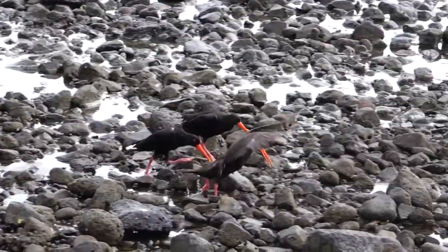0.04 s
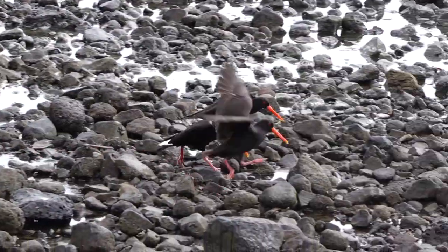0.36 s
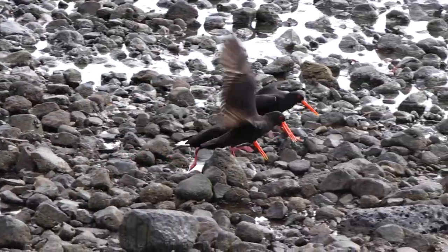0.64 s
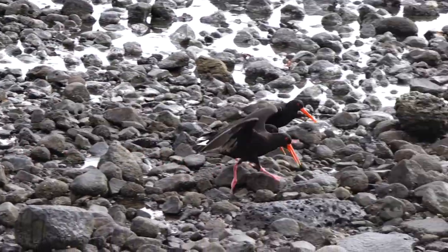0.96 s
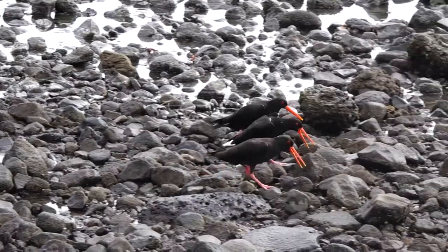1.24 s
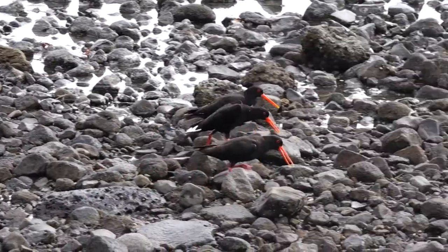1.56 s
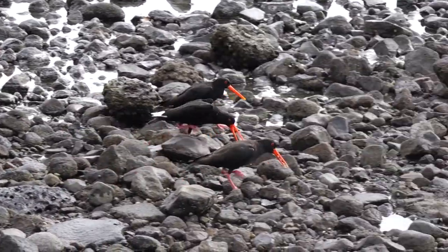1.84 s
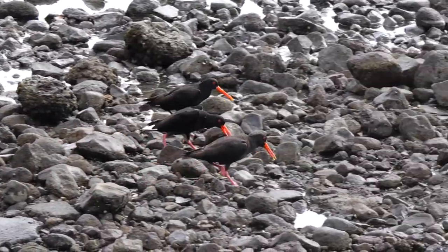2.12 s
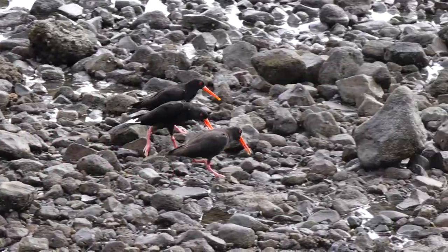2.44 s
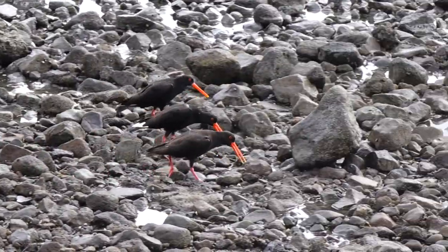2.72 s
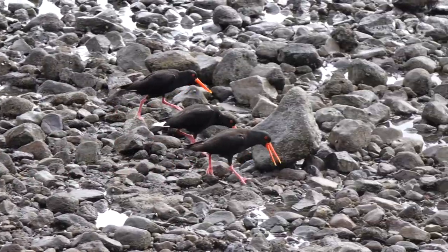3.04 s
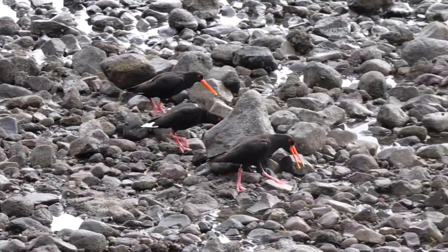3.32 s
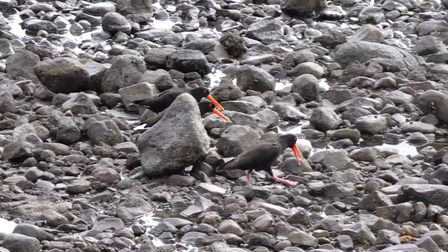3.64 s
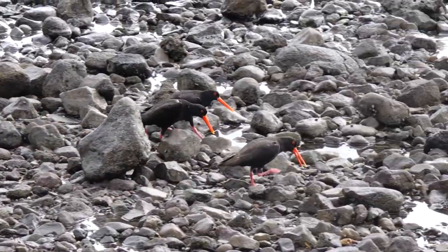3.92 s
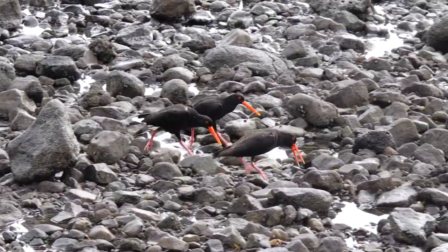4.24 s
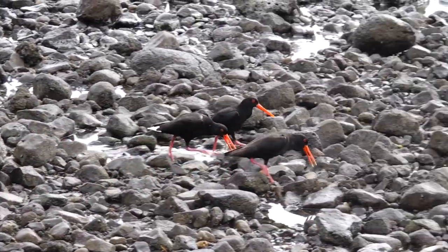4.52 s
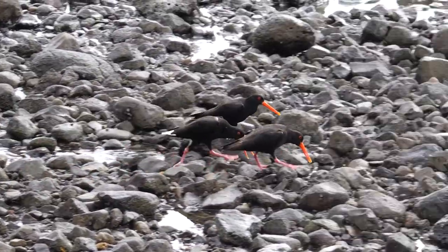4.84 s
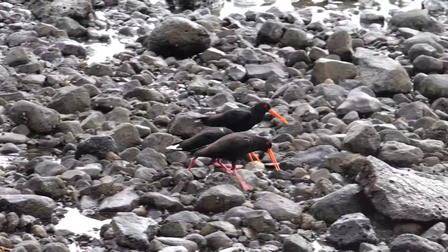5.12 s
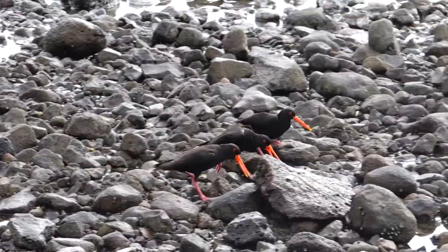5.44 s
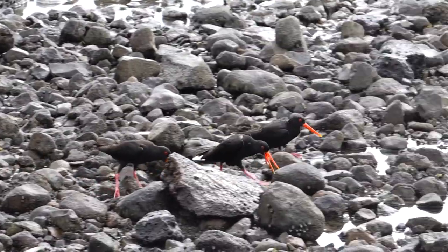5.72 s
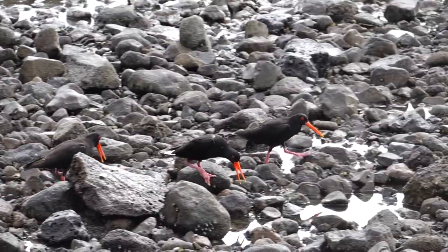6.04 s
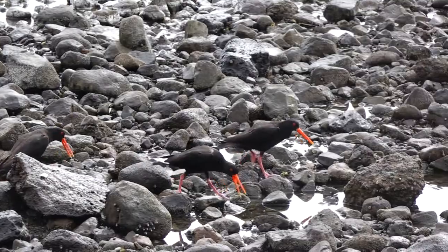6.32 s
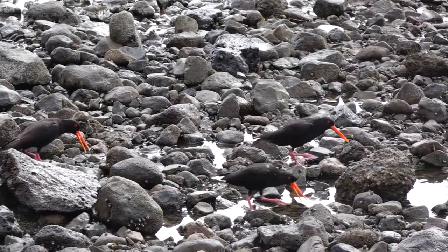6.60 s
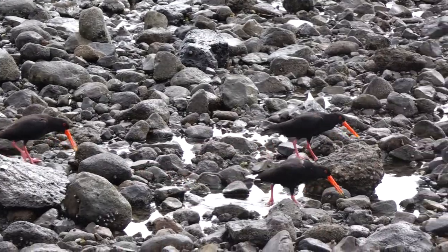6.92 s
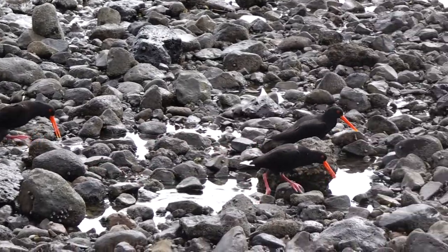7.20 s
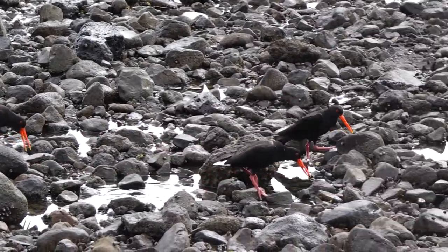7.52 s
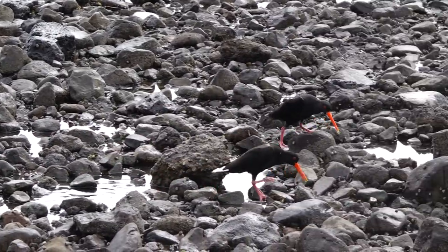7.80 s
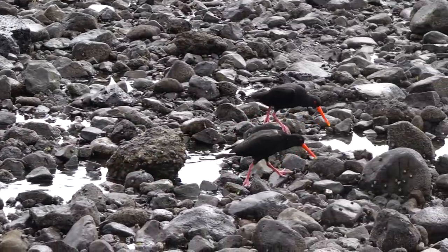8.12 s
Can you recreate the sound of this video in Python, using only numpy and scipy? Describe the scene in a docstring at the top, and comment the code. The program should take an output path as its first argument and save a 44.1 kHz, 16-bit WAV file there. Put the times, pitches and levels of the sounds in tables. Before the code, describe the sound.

Oystercatchers call on a boulder shore for about eight seconds. From the start they pipe very short, sharp, high notes, roughly eight to ten a second at uneven intervals, varying in pitch and strength, some clear whistles and some a little raspy. A shriller, slightly longer call cuts in at about 1.2 seconds, the loudest one at 2.6, and another at 3. From about 4.7 seconds one bird repeats a soft, lower note three or four times a second, quickening slightly, while the sharp piping goes on, with strong notes around 5.4 to 6 seconds. The calls are somewhat softer near the end. The stones give each note a brief, light echo. Underneath, distant surf makes a low, steady wash, with a faint fizz of draining water and a thin hiss that swells slightly in the second half.

```python
"""Oystercatchers pipe short, sharp notes on a boulder shore, with low surf behind them.
Each note is one arch of pitch: its harmonics sweep through the fixed resonances of the windpipe,
so soft notes sound on their second harmonic and full ones on their first. Three shrill calls cut in,
and later one bird repeats a soft note. The stones scatter the calls, while countless far bubbles
make the wash of the surf and the fizz and hiss of the water."""
import sys
import numpy as np
from scipy import signal
from scipy.fft import rfft, irfft, next_fast_len
from scipy.io import wavfile
from scipy.ndimage import uniform_filter1d

SR = 44100
rng = np.random.default_rng(int(sys.argv[2]) if len(sys.argv) > 2 else 0)


def inscribe(sig):
    """Save sig as 16-bit PCM at rate SR to the path in sys.argv[1].

    A 1-D sig is mono; a 2-D sig holds one channel per row.
    Samples are clipped to [-1, 1] before scaling.
    """
    pcm = np.round(np.clip(np.atleast_2d(sig).T, -1, 1) * 32767)
    wavfile.write(sys.argv[1], SR, pcm.astype(np.int16))


N = 359856

# Levels are relative. Gape is how much the open bill lifts the overtones; balance is left minus right.
# piping notes; rasp is the level change before and after the clear whistle:
# (start [s], length [s], top pitch [Hz], level [dB], gape [dB], rasp [dB])
PIPING_NOTES = [(0.038, 0.011, 2110, -26.5, 2, -5), (0.113, 0.018, 1060, -34, -11, -3),
                (0.19, 0.018, 2000, -24.5, -2, -16), (0.431, 0.025, 1834, -26, -12, -13),
                (0.522, 0.011, 1780, -17.5, -18, -5), (0.531, 0.014, 1132, -29, -7, -3),
                (0.623, 0.022, 1970, -29, -4, -6), (0.714, 0.011, 1215, -22.0, -24, -3),
                (0.803, 0.016, 1450, -24.5, -6, -4), (0.814, 0.017, 2144, -24.5, -5, -8),
                (0.902, 0.022, 1470, -31.0, 0, -1), (0.926, 0.02, 1805, -24.5, -20, -15),
                (1.007, 0.028, 1965, -23.5, -3, -7), (1.107, 0.025, 1450, -33, -5, 6),
                (1.12, 0.022, 1950, -29, -13, -4), (1.338, 0.019, 1200, -32, -4, -3),
                (1.395, 0.074, 2181, -26.5, 10.5, 0.5), (1.514, 0.035, 2185, -17.5, -7, -9),
                (1.603, 0.083, 1995, -27.5, 2.5, -2), (1.705, 0.025, 2128, -21.5, -2, -1.5),
                (1.81, 0.064, 2174, -25.5, 7, 2), (1.932, 0.025, 1982, -24.5, -1, -8),
                (2.05, 0.035, 2160, -23, 3, 0.5), (2.103, 0.013, 1970, -29.0, 0, 1),
                (2.282, 0.045, 2130, -26.0, 6, -8), (2.45, 0.022, 1454, -27.5, -10.5, -5),
                (2.619, 0.041, 2216, -26.5, 3, -1), (2.781, 0.015, 2060, -26.5, 4, -4),
                (2.914, 0.031, 2253, -20.5, 1.5, -5), (3.076, 0.01, 2070, -27.5, 8, 0),
                (3.188, 0.019, 1520, -33, 3, -3), (3.213, 0.023, 2190, -27, 6.5, -1),
                (3.315, 0.016, 2250, -26, 3, 2), (3.369, 0.019, 1453, -27, -6, -2.5),
                (3.52, 0.018, 2118, -22, -4.5, -9), (3.59, 0.029, 2090, -28.5, -5, -13),
                (3.665, 0.024, 1530, -33.5, 4, -8), (3.801, 0.035, 2108, -25.5, 0, -3),
                (3.962, 0.021, 1515, -28.5, -5, -2), (4.102, 0.031, 2115, -29.5, 7, -1),
                (4.26, 0.025, 2254, -28.5, -10, -1), (4.37, 0.016, 1503, -34.5, 3, 6),
                (4.404, 0.032, 2264, -22, 1.5, -2.5), (4.461, 0.016, 1370, -33.5, 3, -6),
                (4.534, 0.021, 1530, -30, 7.5, 0), (4.578, 0.036, 2142, -29, 11.5, 7),
                (4.621, 0.027, 2160, -28.5, 1, -3), (4.735, 0.022, 1430, -30.0, -3, -8),
                (4.861, 0.047, 2238, -32.0, 13, 7), (4.966, 0.028, 1775, -24, -11, -16),
                (5.036, 0.013, 1800, -23, -11, -17), (5.098, 0.015, 1860, -25, -5, -15),
                (5.158, 0.016, 2076, -26, -1, 6.5), (5.22, 0.015, 1155, -36, -2, -3),
                (5.36, 0.017, 1166, -35, -6, -2), (5.441, 0.028, 1926, -17.5, -8.5, -3),
                (5.51, 0.022, 1157, -33, -6, -3), (5.588, 0.018, 2220, -26, -12, -14),
                (5.655, 0.022, 1192, -31, -4, -2.5), (5.729, 0.028, 2123, -18.5, 1, 3.5),
                (6.016, 0.045, 2180, -22.5, 11.5, 1.5), (6.293, 0.022, 2098, -26.5, 9, 5.5),
                (6.502, 0.013, 1254, -37, 2, -3), (6.56, 0.023, 2100, -21.5, 4.5, 0.5),
                (6.627, 0.014, 1925, -29.5, -5, -13), (6.749, 0.01, 1100, -31, -8, -3),
                (6.864, 0.015, 1400, -29.5, -4, -1), (7.099, 0.023, 1725, -23.0, -27, -7),
                (7.125, 0.018, 1430, -33, -1, -3), (7.207, 0.019, 2066, -23, -6, -13),
                (7.323, 0.025, 1926, -27.5, -1, -17), (7.391, 0.017, 1474, -30.5, -3, 4),
                (7.449, 0.013, 1190, -33, -5, -2), (7.576, 0.022, 1255, -33, -6, -3),
                (7.668, 0.034, 1142, -33, -1, -3), (7.805, 0.024, 1503, -34, 4, 0),
                (7.827, 0.011, 2010, -29.5, 9, 0), (7.963, 0.016, 1394, -26.5, -2, -5),
                (8.063, 0.029, 1437, -30.5, 3.5, -13)]
# three shrill calls, a list of points each: (time [s], pitch [Hz], level [dB], gape [dB])
SHRILL_CALLS = [
    [(1.145, 2140, -22, -2), (1.16, 2390, -20, 10), (1.166, 2660, -19.5, 12), (1.178, 2584, -17.5, -6),
     (1.202, 2545, -17.5, 10), (1.208, 2367, -17.5, 13), (1.235, 2315, -21.5, 5.5), (1.285, 2040, -26.5, 8),
     (1.302, 1680, -23.5, -5)],
    [(2.615, 1890, -22.5, -2), (2.629, 2180, -22, 9.5), (2.633, 2550, -15, 3), (2.641, 2657, -13, 2.5),
     (2.657, 2490, -14, -7), (2.662, 2175, -21, 1), (2.67, 2000, -18.5, -8), (2.678, 1900, -31, -2)],
    [(2.957, 1930, -40, 0), (2.964, 2090, -33, 18), (2.972, 2310, -30, 14), (2.974, 2600, -22, 8),
     (2.982, 2680, -19.5, 11), (2.998, 2530, -24, 4), (3.002, 2180, -26, 10.5), (3.017, 1790, -32, 2)],
]
# how hard the trilling bird calls: (time [s], level [dB], top pitch [Hz])
TRILL_EFFORT = [(4.7, -39, 1140), (5.28, -34.5, 1200), (5.57, -28, 1172), (5.85, -30.5, 1160),
                (6.13, -31.5, 1190), (6.41, -34, 1170), (6.7, -33.5, 1124), (6.96, -36, 1092),
                (7.23, -39, 1080), (7.5, -30, 1140), (7.77, -30, 1135)]
# resonances, where the windpipe rings: (frequency [Hz], width [Hz], level [dB])
WINDPIPE_RESONANCES = [(2150, 990, 2), (4460, 420, -8), (6520, 710, -12.5), (8950, 460, -27),
                       (10200, 3000, -26.5), (13300, 1700, -31), (15300, 900, -38)]
# what passes between the resonances: (frequency [Hz], level [dB])
WINDPIPE_FLOOR = [(1000, -57), (7000, -18.5), (9000, -33.5), (16000, -48)]
# which side the calls lean to: (frequency [Hz], balance [dB])
BIRD_BALANCE = [(2500, -1), (4400, 8), (6500, -5.5), (9000, 1)]
# how long the shore echoes: (frequency [Hz], time to fade by 60 dB [s])
SHORE_DECAY = [(500, 0.22), (2300, 0.58), (4500, 0.23), (9000, 0.21), (15000, 0.16)]
# tone of the surf: (frequency [Hz], level [dB])
SURF_SPECTRUM = [(15, -72), (25, -42), (49, -66), (109, -16.5), (196, -15.5), (297, -5), (423, -1.5),
                 (628, -6), (806, -4), (1100, -1), (1300, -4), (1530, -1.5), (2100, -3.5), (2430, -9),
                 (3600, -18), (4680, -32), (7920, -120)]
# humps and dips in that tone: (frequency [Hz], width [Hz], level [dB])
SURF_HUMPS = [(410, 190, 0.5), (600, 180, 0.5), (812, 95, 3.5), (1090, 190, 2.5), (1485, 170, -4.5),
              (2170, 300, -2)]
# loudness of the surf: (time [s], level [dB])
SURF_LEVEL = [(0.0, -32.5), (1.07, -34.5), (4.79, -33.5), (8.14, -35), (8.16, -36)]
# tone of water fizzing as it drains among the stones: (frequency [Hz], level [dB])
FIZZ_SPECTRUM = [(1760, -20.5), (3000, -3.5), (3210, -14.5), (3870, -6.5), (4350, 0), (4790, -0.5),
                 (5700, -3.5), (6490, 0), (7610, -2.5), (8620, -8), (13800, -13.5), (15600, -19.5)]
# loudness of the fizz: (time [s], level [dB])
FIZZ_LEVEL = [(0.0, -43.5), (1.66, -42.5), (2.18, -44), (3.02, -42), (6.57, -43), (6.77, -44), (8.16, -44)]
# tone of a thin hiss of water: (frequency [Hz], level [dB])
HISS_SPECTRUM = [(2500, -40), (5400, -22), (6300, -1), (7000, 0), (7700, -7), (8800, -25), (15000, -45)]
# the hiss swells unevenly: (time [s], level [dB])
HISS_LEVEL = [(0, -58), (1.5, -53), (2.6, -60), (4.5, -57), (5.7, -48), (7.2, -53), (8.16, -49)]
# how alike the water sounds left and right: (frequency [Hz], likeness [0-1])
WATER_LIKENESS = [(30, .8), (100, 0.98), (400, 0.98), (1000, 0.93), (2200, 0.67), (4000, 0.62), (8000, .35),
                  (15000, .35)]
# which side the water leans to: (frequency [Hz], balance [dB])
WATER_BALANCE = [(40, -3), (150, -0.7), (700, -3), (1500, -0.4), (4000, -1.5), (12000, -1)]
# how far the wave at the left microphone is ahead: (frequency [Hz], phase lead [rad])
MIC_PHASE = [(100, 0.18), (700, -0.19), (1400, -0.33), (2300, -0.59), (4300, -2.03), (6500, -1.59),
             (15000, -1.63)]

REST_HZ, TOP_HZ = 857.6, 15800  # foot of each arch of pitch; upper limit of the whole sound


def piping_note(start_s, length_s, top_hz, level_db, gape_db, rasp_db,
                rise_share=.297, lead_s=.008, tail_s=.021):
    """Air pressure arches up and down, carrying the pitch: a rasp, a clear whistle, a falling tail."""
    rise_s = rise_share * length_s
    fall_s = length_s - rise_s
    t = np.arange(-rise_s - 4 * lead_s, fall_s + 3 * tail_s, 1 / SR)  # zero at the top of the arch
    half_s = np.where(t < 0, rise_s, fall_s)
    linger_s = np.where(t < 0, lead_s, tail_s)
    arch = .47 / (1 + abs(t / half_s) ** 4.45)
    low_register = .53 * np.exp(-np.maximum(abs(t) - half_s, 0) / linger_s)
    pressure = arch + low_register
    pitch = REST_HZ + (top_hz - REST_HZ) * pressure
    whistle_pressure = np.where(t < 0, .918, .73)  # the whistle catches late and lets go late
    slack = 1 / (1 + np.exp((pressure - whistle_pressure) / .024))  # 0 = whistle, 1 = rasp
    falter_db = -5.5 * np.sin(np.pi * slack) * (t > 0)  # a dip as the whistle lets go
    loud_db = level_db + 1.01 * 20 * np.log10(pressure) + rasp_db * slack + falter_db
    closing_db = -4 * (1 - pressure)  # the bill is wide open only at the top
    second_db = gape_db + .74 + closing_db
    treble_db = .76 * gape_db + closing_db
    note = voice_box(pitch, loud_db, second_db, treble_db, slack) * signal.windows.tukey(len(t), .15)
    return start_s + rise_s + t[0], sides(-.3)[:, None] * note


def shrill_call(points):
    """A longer note whose pitch jumps up to a higher register and drops back."""
    times, *curves = np.transpose(points)
    t = np.arange(times[0] - .002, times[-1] + .002, 1 / SR)
    fade = np.clip(np.minimum(t - t[0], t[-1] - t) / .003, 0, 1)
    pitch, level_db, gape_db = (np.interp(t, times, curve) for curve in curves)
    call = voice_box(pitch, level_db, gape_db + 2.5, gape_db - 1, jitter=.003, shimmer_db=.8)
    return t[0], sides(-.5)[:, None] * fade * call


def trill(count=12, first_s=4.706, gap_s=.293, quicken_s=.0028, length_s=.037, gape_db=-3, rasp_db=-.5):
    """One soft note repeats and slowly quickens, its level and pitch following the bird's effort."""
    starts = first_s + np.cumsum([0] + [gap_s - quicken_s * k for k in range(count - 1)])
    times, level_db, pitch = np.transpose(TRILL_EFFORT)
    return [(s, length_s, np.interp(s, times, pitch), np.interp(s, times, level_db), gape_db, rasp_db)
            for s in starts]


def chatter(count=8, from_s=.05, to_s=4.6, level_db=-35, gape_db=-4, rasp_db=-2.5):
    """Faint low notes at loose intervals, before the trill gets going."""
    notes = []
    for k in range(count):
        start_s = from_s + (to_s - from_s) * (k + rng.random()) / count
        length_s, top_hz = rng.uniform(.018, .035), rng.uniform(1100, 1450)
        notes.append((start_s, length_s, top_hz, level_db, gape_db, rasp_db))
    return notes


def voice_box(pitch, level_db, second_db, treble_db, slack=0., jitter=.0048, shimmer_db=1.4):
    """Vibrating membranes make harmonics (multiples of the pitch); when slack, they buzz roughly."""
    size = len(pitch)
    pitch = pitch * (1 + jitter * wander(size, 254) + .028 * slack * wander(size, 406))
    phase = 2 * np.pi * (np.cumsum(pitch) / SR + rng.random())
    harmonic = np.arange(1, 10)[:, None]
    hz = harmonic * pitch
    # slackness weakens the first harmonic and the high ones, leaving a buzz near 2-3 kHz
    slack_db = -6 * slack * np.where(harmonic == 1, 1, np.interp(hz, [3000, 3800], [0, 1]))
    flicker_db = (1.94 + 2.5 * slack) * np.array([wander(size, 160.8) for _ in harmonic])
    gain = windpipe(hz, second_db, treble_db) * amp(slack_db + flicker_db) * (hz < TOP_HZ)
    loudness = np.sqrt(2) * amp(level_db + shimmer_db * wander(size, 163.6))
    return loudness * (gain * np.sin(harmonic * phase)).sum(0)


def windpipe(hz, second_db, treble_db):
    """The air column rings at fixed frequencies; the bill lifts or dims its second one and the treble."""
    power = sum(amp(db) ** 2 / (1 + (2 * (hz - centre) / width) ** 2) ** 2
                for centre, width, db in WINDPIPE_RESONANCES)
    power += amp(curve_at(WINDPIPE_FLOOR, hz)) ** 2
    second_band = np.interp(hz, [2700, 4000, 5000, 6000], [0, 1, 1, 0])
    treble_band = np.interp(hz, [5000, 6000], [0, 1])
    return np.sqrt(power) * amp(second_band * second_db + treble_band * treble_db)


def birds():
    """All the calls together, with some overtones leaning left and others right."""
    calls = np.zeros((2, N))
    for note in list(PIPING_NOTES) + chatter():
        add(calls, *piping_note(*note))
    for note in trill():  # these slide up slowly and end quickly
        add(calls, *piping_note(*note, rise_share=.6, lead_s=.028, tail_s=.008))
    for points in SHRILL_CALLS:
        add(calls, *shrill_call(points))
    size = next_fast_len(N)
    lean = sides(curve_at(BIRD_BALANCE, np.fft.rfftfreq(size, 1 / SR)))
    return irfft(rfft(calls, size) * lean, size)[:, :N]


def boulder_echoes(calls, near_db=-12, near_s=.008, near_count=14, far_db=-18, far_per_s=2000):
    """Stones near the birds throw back a few quick echoes; the wider shore adds a thin tail."""
    near = np.zeros((2, SR))
    delays = ((.001066 + near_s * rng.exponential(1, near_count).clip(0, 4)) * SR).astype(int)
    near[:, delays] = rng.standard_normal((2, near_count)) * np.exp(-delays / SR / near_s / 2)
    bounces = rng.choice([-1., 1.], (2, SR)) * (rng.random((2, SR)) < far_per_s / SR)
    hz, t, bands = signal.stft(bounces, SR, nperseg=256)
    decay = amp(-60 * t / curve_at(SHORE_DECAY, hz)[:, None])
    build_up = 1 - np.exp(-t / .0081)
    far = signal.istft(bands * decay * build_up, SR, nperseg=256)[1][:, :SR]
    echoes = amp(near_db) * near / np.linalg.norm(near[0]) + amp(far_db) * far / np.linalg.norm(far[0])
    return signal.fftconvolve(calls, echoes, axes=1)[:, :N]


def water(spectrum, levels, humps=(), patchy_db=1.5):
    """Countless far bubbles merge into noise with drifting louder patches, a little to the right."""
    frames, hz = N // 512 + 5, np.fft.rfftfreq(2048, 1 / SR)
    draws = rng.standard_normal((5, frames, len(hz)))
    left, unrelated = draws[0] + 1j * draws[1], draws[2] + 1j * draws[3]
    likeness = curve_at(WATER_LIKENESS, hz)
    right = likeness * left + np.sqrt(1 - likeness ** 2) * unrelated
    patches = uniform_filter1d(draws[4], size=8, axis=0)  # smooth over time
    patches = unit(uniform_filter1d(patches, size=16, axis=1))  # then over frequency
    humps_db = sum(db / (1 + (2 * (hz - centre) / width) ** 2) for centre, width, db in humps)
    tone = amp(curve_at(spectrum, hz) + humps_db + patchy_db * patches)
    bands = np.array([left, right]) * tone * sides(curve_at(WATER_BALANCE, hz))[:, None]
    noise = signal.istft(bands.transpose(0, 2, 1), nperseg=2048, noverlap=1536)[1][:, :N]
    return unit(noise) * amp(np.interp(np.arange(N) / SR, *np.transpose(levels)))


def amp(db):
    """Turns decibels into a number to multiply by."""
    return 10 ** (np.asarray(db) / 20)


def unit(x):
    """Scales a signal to an average power of 1."""
    return x / np.sqrt(np.mean(x ** 2) + 1e-20)


def curve_at(points, hz):
    """Joins (frequency, value) points with lines, giving each octave equal room."""
    frequencies, values = np.transpose(points)
    return np.interp(np.log(hz + 1), np.log(frequencies + 1), values)


def add(mix, start_s, sound):
    """Mixes in a stereo sound, cutting off whatever falls outside the mix."""
    start = round(start_s * SR)
    sound = sound[:, max(-start, 0):]
    part = mix[:, max(start, 0):][:, :sound.shape[1]]
    part += sound[:, :part.shape[1]]


def wander(size, rate_hz):
    """A smooth random wobble, about 1 in size, up to about the given rate."""
    position = np.arange(size) * 2 * rate_hz / SR
    return 1.2 * np.interp(position, np.arange(1000), rng.standard_normal(1000).clip(-2, 2))


def sides(balance_db):
    """Left and right gains; a positive balance leans left."""
    return np.array([amp(balance_db / 2), amp(-balance_db / 2)])


def scene():
    """The birds and their echoes over surf and draining water."""
    calls = birds()
    surf = amp(.8) * water(SURF_SPECTRUM, SURF_LEVEL, SURF_HUMPS, patchy_db=1.22)
    fizz = amp(1.6) * water(FIZZ_SPECTRUM, FIZZ_LEVEL)
    hiss = water(HISS_SPECTRUM, HISS_LEVEL)
    return calls + boulder_echoes(calls) + surf + fizz + hiss


def record(dry, wind_cut_hz=70):
    """Two close microphones, the right mostly hearing first; filters cut rumble and the top treble."""
    size = next_fast_len(N)
    hz = np.fft.rfftfreq(size, 1 / SR)
    phase_turn = np.exp(.5j * curve_at(MIC_PHASE, hz))
    wind_filter = hz / np.hypot(hz, wind_cut_hz)
    heard = irfft(rfft(dry, size) * np.array([phase_turn, 1 / phase_turn]) * wind_filter, size)[:, :N]
    treble_cut = signal.firwin(511, TOP_HZ, window=("kaiser", 9), fs=SR)
    return signal.oaconvolve(heard, treble_cut[None], "same")


dry = scene()
out = record(dry)
inscribe(out)
```